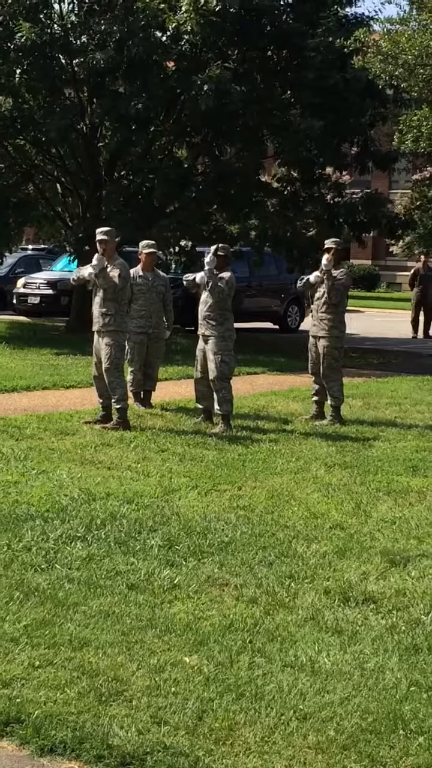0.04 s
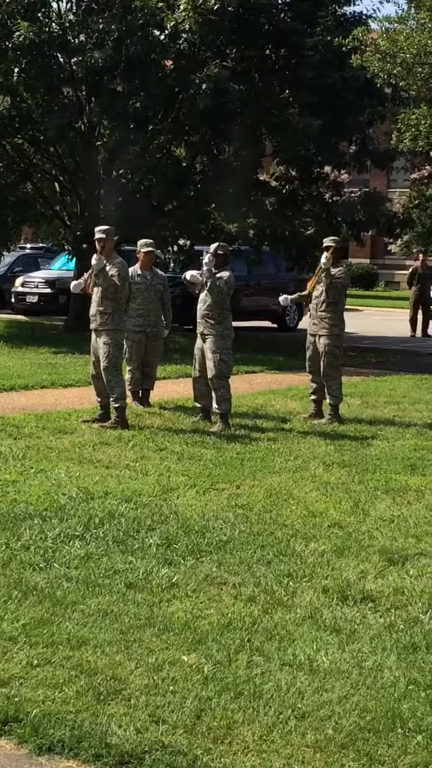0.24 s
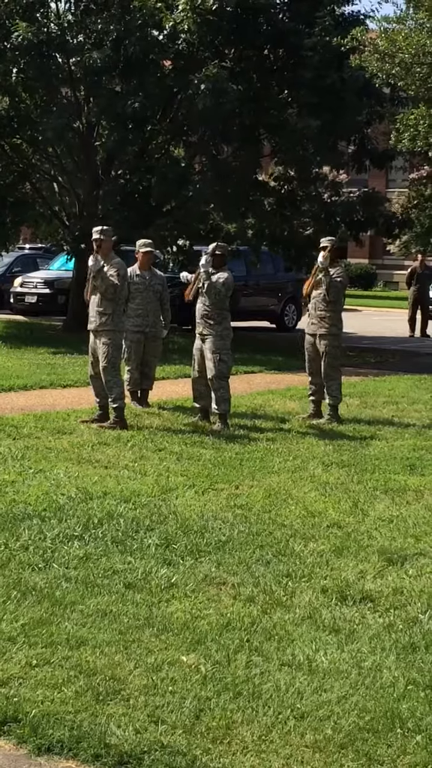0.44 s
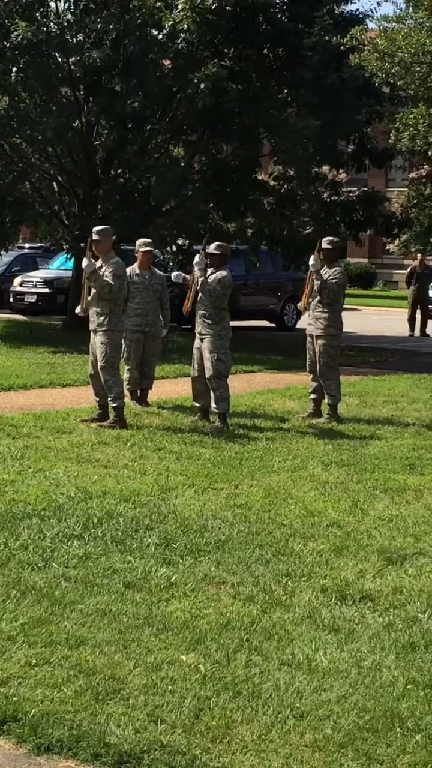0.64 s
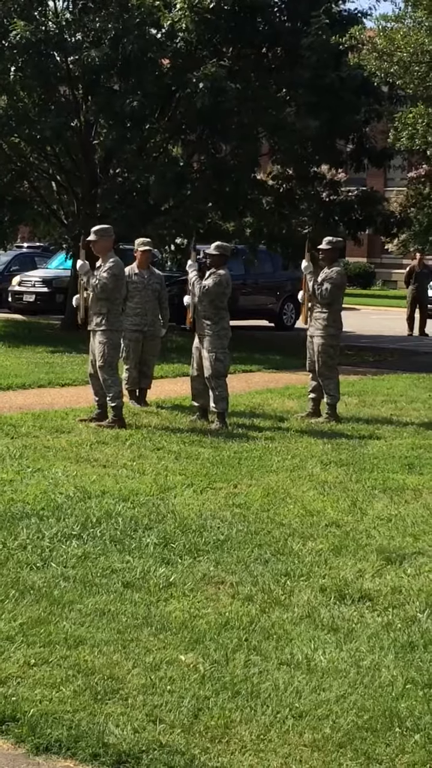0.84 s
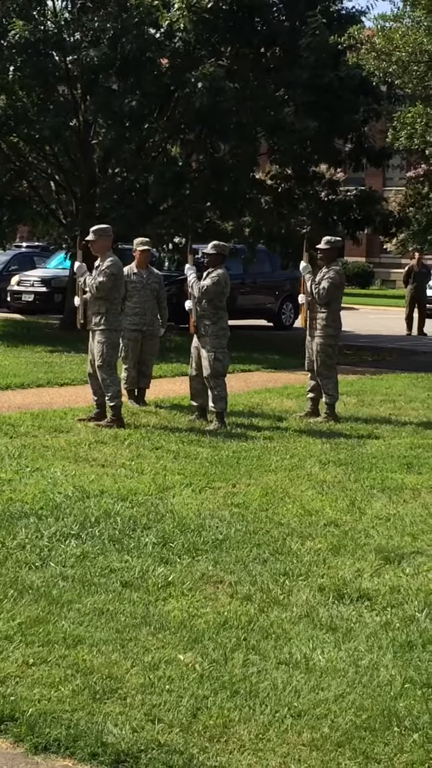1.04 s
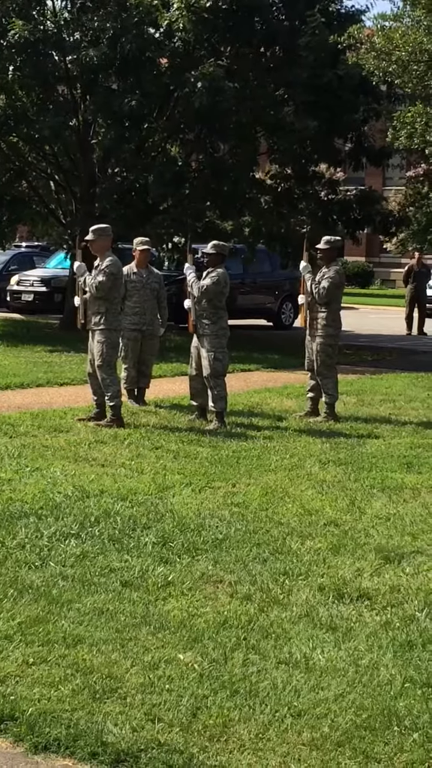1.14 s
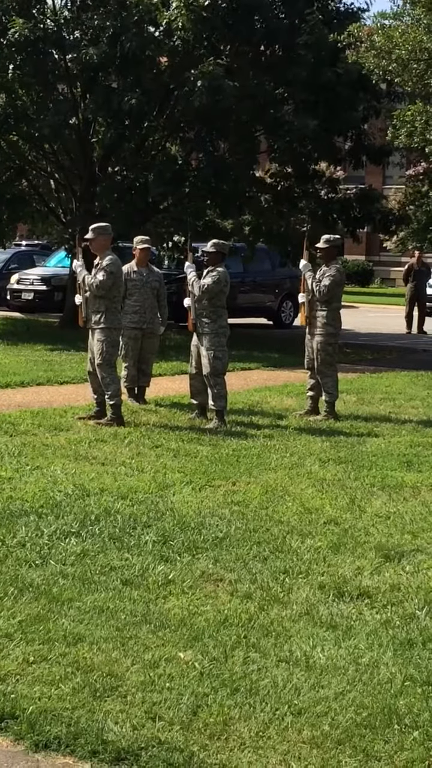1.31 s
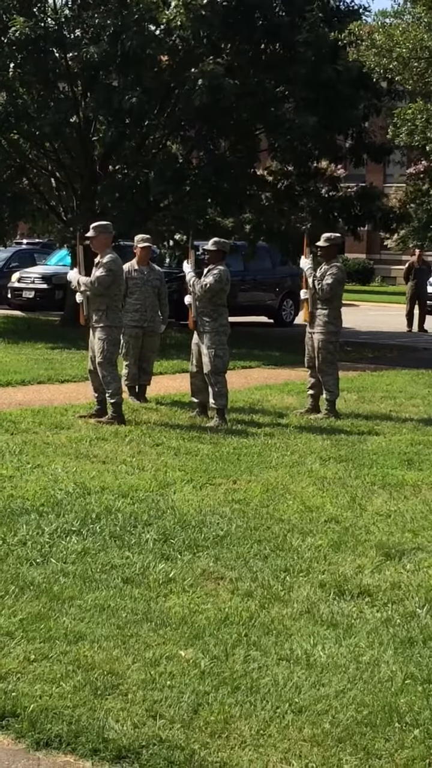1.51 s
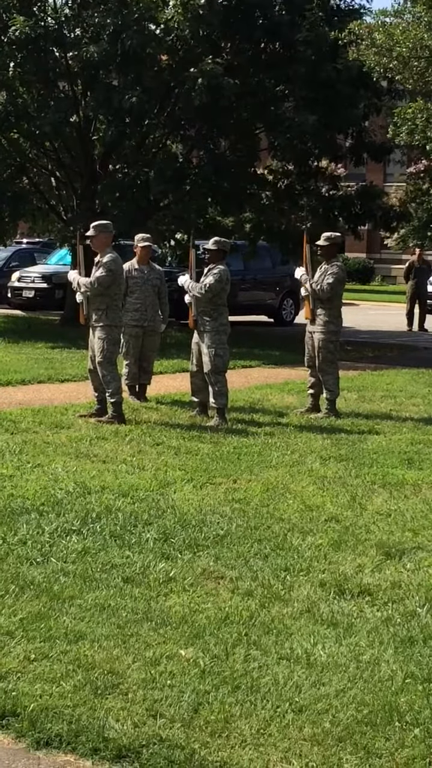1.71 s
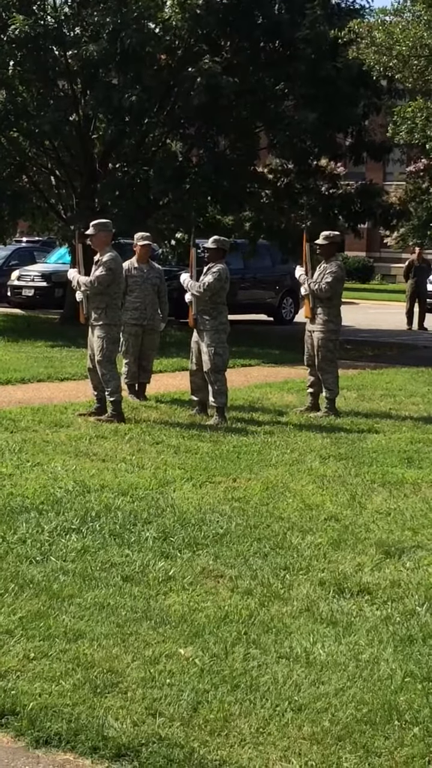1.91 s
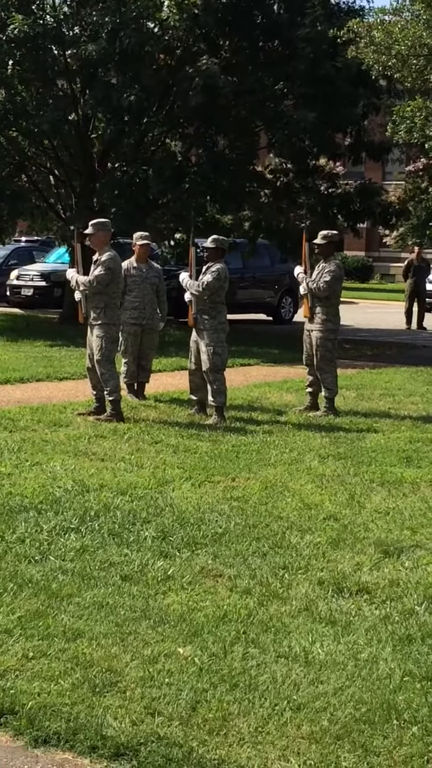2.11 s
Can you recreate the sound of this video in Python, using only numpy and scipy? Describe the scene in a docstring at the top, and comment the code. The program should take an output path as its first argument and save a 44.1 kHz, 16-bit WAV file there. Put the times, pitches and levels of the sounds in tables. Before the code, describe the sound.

A ragged volley of rifle shots cracks across a lawn, echoing off buildings and fading fast

```python
"""A lawn between trees and buildings: a few rifles fire a ragged volley. Blasts are N-shaped pressure pulses
with noise crackle; leaves scatter a bright hiss that dies fast. Walls send back single slaps and dull noise
booms in waves about .45 s apart; a few short sharp clicks follow. Behind it: distant traffic (shaped noise), a
buzzing insect (ticks ringing resonances), two wavering whistles and a faint hum (sines), small metal pings and
dry clicks."""
import sys
import numpy as np
from scipy import signal
from scipy.fft import rfft, irfft
from scipy.io import wavfile

SR = 44100
rng = np.random.default_rng(int(sys.argv[2]) if len(sys.argv) > 2 else 0)


def output_pcm(signal):
    """Save a mono or channel-first signal as 16-bit PCM at the path in sys.argv[1].

    Samples are clipped to [-1, 1] before scaling.
    """
    pcm = np.clip(np.atleast_2d(signal).T, -1, 1) * 32767
    wavfile.write(sys.argv[1], SR, np.round(pcm).astype(np.int16))


def gain_from_decibels(decibels):
    """Convert decibel values to linear amplitude factors."""
    exponent = np.asarray(decibels, float) / 20
    return 10 ** exponent


N = 94815


def rms_one(x):
    """Scale to rms 1."""
    return x / np.sqrt(np.mean(x ** 2) + 1e-20)


def in_time(rows):
    """Table columns as curves in time; ends are held."""
    time_s, *columns = np.transpose(rows)
    return [np.interp(np.arange(N) / SR, time_s, column) for column in columns]


def at_hz(points, hz):
    """Read a table on a log-frequency axis."""
    table_hz, table_db = np.transpose(points)
    return np.interp(np.log(hz), np.log(table_hz), table_db)


def drift(rate_hz):
    """Slow random curve, rms 1: noise through two equal one-pole low-passes, drawn every 40 samples."""
    r = np.exp(-80 * np.pi * rate_hz / SR)
    noise = rng.standard_normal(N // 40 + 2002)
    slow = signal.lfilter([1], [1, -2 * r, r * r], noise)[2000:]
    return np.interp(np.arange(N) / 40, np.arange(len(slow)), rms_one(slow))


def colour(x, spectrum):
    """Shape a noise to a spectrum; rms 1."""
    hz = np.maximum(np.fft.rfftfreq(N, 1 / SR), 1)
    return rms_one(irfft(rfft(x) * gain_from_decibels(at_hz(spectrum, hz)), N))


def bandpass(x, order, low_hz, high_hz):
    """Butterworth band-pass."""
    return signal.sosfilt(signal.butter(order, [low_hz, high_hz], "band", fs=SR, output="sos"), x)


def ring(clicks, hz, t60_s):
    """Two-pole resonance: a unit click sets a decaying sine of height 1 ringing."""
    r, w = gain_from_decibels(-60 / (t60_s * SR)), 2 * np.pi * hz / SR
    return signal.lfilter([0, np.sin(w)], [1, -2 * r * np.cos(w), r * r], clicks + 1e-18)


def add(out, start_s, piece):
    """Mix a piece in at start_s."""
    i = int(start_s * SR)
    out[i:i + len(piece)] += piece[:N - i]


# distant traffic spectrum: hz, relative_db_per_hz
TRAFFIC_COLOUR = [(20, -14), (40, -1.5), (120, 1.5), (200, -7.5), (300, -17), (600, -15.5), (1300, -22),
                  (2700, -29), (4500, -34), (8000, -38), (9500, -44.5), (13000, -50), (16000, -79)]


def traffic():
    """Steady low-heavy noise with a slowly drifting level."""
    level_db = -38.5 + 0.95 * drift(1.4)
    return gain_from_decibels(level_db) * colour(rng.standard_normal(N), TRAFFIC_COLOUR)


# insect body resonances: hz, relative_db, t60_s
TYMBAL = [(4180, -9, .02), (4980, -1, .02), (5300, -2, .018), (5900, -3, .014), (6670, 1, .026),
          (7320, -6, .012), (7880, -4, .014), (8400, -9, .01), (12250, -18, .012)]
# insect level: time_s, rms_db
BUZZ = [(0, -60), (.7, -59), (1.0, -58.5), (1.2, -52.5), (1.75, -58), (2.15, -55)]


def insect():
    """An uneven group of ticks repeats evenly; each resonance answers the ticks in its own pattern."""
    groups_per_s, ticks_per_group = 50.25, 7
    times_s = np.arange(0, N / SR, 1 / (groups_per_s * ticks_per_group))
    body = 0
    for hz, relative_db, t60_s in TYMBAL:
        pattern_db = 4.0 * rng.standard_normal(ticks_per_group)
        pattern_db[0] += 12  # one strong tick per group
        pattern = rms_one(gain_from_decibels(pattern_db) * rng.choice([-1, 1], ticks_per_group))
        place = (np.arange(len(times_s)) + rng.integers(ticks_per_group)) % ticks_per_group
        ticks = np.zeros(N)
        ticks[(times_s * SR).astype(int)] = pattern[place] * gain_from_decibels(rng.normal(0, 1.0, len(times_s)))
        softened = bandpass(ticks, 1, hz * .9, hz * 1.1)
        body = body + gain_from_decibels(relative_db + 1.1 * drift(2.4)) * rms_one(ring(softened, hz, t60_s))
    return gain_from_decibels(in_time(BUZZ)[0]) * rms_one(body)


# pitches of high whistle, low whistle, hum: pitch_hz
TONE_HZ = (2919, 2395, 420)
# levels before waver: time_s, rms_db
HIGH_WHISTLE = [(0, -66), (.17, -53), (.25, -74), (.78, -54), (1.05, -55), (1.24, -70), (1.3, -51),
                (1.4, -57.5), (1.52, -44.5), (1.6, -50), (1.7, -46), (1.77, -57), (1.95, -58.5),
                (2.04, -46.5), (2.12, -55.5)]
LOW_WHISTLE = [(0, -85), (.53, -42), (.66, -72), (.71, -49), (.77, -64), (1.18, -58.5), (1.24, -48),
               (1.3, -57.5), (1.46, -53), (1.76, -62.5), (1.88, -47.5), (2.05, -68)]
HUM = [(1.3, -70), (1.46, -47), (1.54, -55), (1.6, -44), (1.66, -56), (1.72, -49), (1.8, -52.5),
       (1.85, -69)]


def whistles():
    """Two whistles and a low hum: sines whose strength wavers and flutters and whose phase wanders."""
    waver_db, flutter_hz, flutter_share = 1.2, 60, .14
    t, out = np.arange(N) / SR, 0
    for pitch_hz, level in zip(TONE_HZ, (HIGH_WHISTLE, LOW_WHISTLE, HUM)):
        flutter = 1 + flutter_share * drift(flutter_hz)
        level_db = in_time(level)[0] + waver_db * drift(22)
        tone = np.sin(2 * np.pi * pitch_hz * t + 0.49 * drift(23))
        out = out + np.sqrt(2) * gain_from_decibels(level_db) * flutter * tone
    return out


# ringing modes of a small metal part: hz, relative_db, t60_s
PING_MODES = [(8070, 3, 0.28), (10900, 3.5, 0.16)]
# taps on it: start_s, level_db
PING_TAPS = [(.038, -51), (.115, -60)]


def metal_pings():
    """Band-softened taps set the modes of a small metal part ringing."""
    taps = np.zeros(N)
    for start_s, level_db in PING_TAPS:
        add(taps, start_s, gain_from_decibels(level_db) * np.ones(1))
    out = np.zeros(N)
    for hz, relative_db, t60_s in PING_MODES:
        out += gain_from_decibels(relative_db) * ring(bandpass(taps, 1, hz * .95, hz * 1.05), hz, t60_s)
    return out


# short dry clicks, from triggers and bolts or thrown back by a wall: start_s, peak_db, centre_hz
CLICKS = [(0.204, -35, 4630), (0.209, -41, 5400), (.676, -24, 1300), (.735, -23, 1570)]


def dry_clicks():
    """Each click is a decaying noise burst in a band around its centre."""
    t60_s = .02
    out, t = np.zeros(N), np.arange(int(.03 * SR)) / SR
    for start_s, peak_db, centre_hz in CLICKS:
        burst = rng.standard_normal(len(t)) * gain_from_decibels(-60 * t / t60_s)
        burst = bandpass(burst, 4, centre_hz / 1.6, centre_hz * 1.6)
        add(out, start_s, gain_from_decibels(peak_db) * burst / np.abs(burst).max())
    return out


def grains():
    """Dense random echoes of uneven size over smooth noise."""
    echoes_per_s, spread_db = 1300, 3.0
    hit = rng.random(N) < echoes_per_s / SR
    size_db = spread_db * np.minimum(rng.exponential(1, N), 4)
    echoes = hit * gain_from_decibels(size_db) * rng.choice([-1, 1], N)
    return rms_one(echoes) + 0.84 * rng.standard_normal(N)


# returns from walls and far trees: time_s, middle_rms_db, bass_rms_db
RETURN = [(.205, -56, -32), (.212, -42, -44), (.215, -21, -31), (.224, -27.5, -49), (.228, -13.5, -17.5),
          (.245, -20.5, -36), (.28, -18.5, -19), (.30, -22, -21), (.33, -18.5, -20), (.365, -16, -20.5),
          (.41, -22.5, -22.5), (.48, -29.5, -25.5), (.57, -35.5, -28.5), (.65, -36.5, -29),
          (.666, -44, -41), (.674, -25.5, -28), (.72, -26.5, -26), (.79, -27, -21.5), (.85, -37, -38.5),
          (1.08, -40, -32.5), (1.18, -31.5, -28), (1.24, -38.5, -34.5), (1.4, -42.5, -46),
          (1.54, -49.5, -41.5), (1.6, -41, -38.5), (1.8, -51.5, -55), (2.0, -74, -41.5)]
# spectra of middle and bass: hz, relative_db_per_hz
RETURN_COLOUR = [(180, -31), (300, -2), (580, 2.5), (929, -5), (1130, -6), (1770, -21), (2330, -18.5),
                 (5000, -37.5), (6500, -54)]
BOOM_COLOUR = [(18, -46), (30, -0.5), (102, 6.5), (150, 4.5), (190, 5), (265, -5), (330, -17), (430, -121)]


def returns():
    """Dull echoes roll back: middle and bass swell on their own."""
    middle_db, bass_db = in_time(RETURN)
    fade_in = np.clip((np.arange(N) / SR - .19) / .015, 0, 1)
    middle = gain_from_decibels(middle_db) * colour(grains(), RETURN_COLOUR)
    bass = gain_from_decibels(bass_db) * colour(rng.standard_normal(N), BOOM_COLOUR)
    return fade_in * (middle + bass)


# scatter from foliage: time_s, level_db
LEAF = [(.2255, -61), (.2270, -15.5), (.2370, -19), (.2480, -21.5), (.2650, -18), (.3000, -19.5),
        (.3400, -18.5), (.4100, -23), (.4800, -27.5), (.5500, -37.5), (.7000, -45.5), (1.25, -50.5),
        (1.7, -77)]
# its starting spectrum: hz, relative_db_per_hz
LEAF_COLOUR = [(800, -3), (1870, -1), (3380, -4.5), (6780, -4), (12800, -7.5), (15500, -13), (16000, -37)]
# colour change with travel: hz, change_db_per_s
LEAF_LOSS = [(1000, 9), (3000, 9.5), (6000, -30), (16000, -82)]


def leaves():
    """Scattered hiss in quarter-octave bands; the top dies first."""
    level_db, = in_time(LEAF)
    travel_s = np.clip(np.arange(N) / SR - .3, 0, .5)
    noise = colour(rng.standard_normal(N), LEAF_COLOUR)
    edges_hz, out = 900 * 2 ** np.arange(0, 4.3, 1 / 4), 0
    for k, (low_hz, high_hz) in enumerate(zip(edges_hz, edges_hz[1:])):
        shifted = np.roll(noise, k % 2 * 9000)  # keeps neighbouring bands unrelated
        change_db = travel_s * at_hz(LEAF_LOSS, np.sqrt(low_hz * high_hz))
        out = out + bandpass(shifted, 2, low_hz, high_hz) * gain_from_decibels(change_db)
    return out * gain_from_decibels(level_db + 1.6 * drift(90))


def pulse(length_ms, rise):
    """N-shaped pressure pulse with rounded corners and a decaying tail; rise is a share of the length."""
    u = np.arange(int(length_ms * SR / 250)) / (length_ms * SR / 1000)
    return (1 - np.exp(-u / rise)) * (1 - 2 * u) * np.exp(-(1.6 * u) ** 2) * 1.1


# late single echoes off walls, and three short sharp clicks near 1 s: start_s, level_db, length_ms
SLAPS = [(.7070, 0.5, 2.4), (0.7352, -5, 2.14), (0.7725, -4, 10.7), (.9322, -10.5, 1.3), (.9683, -11, 0.5),
         (1.0035, -15.5, 0.4), (1.013, -8.5, 8.1), (1.215, -7.5, 6.1)]


def slaps():
    """Late wall echoes and a few short sharp clicks: pressure pulses rounded by a low-pass."""
    out, low_pass = np.zeros(N), signal.butter(2, 7600, fs=SR)
    for start_s, level_db, length_ms in SLAPS:
        rounded = signal.lfilter(*low_pass, pulse(length_ms, rise=0.36))
        add(out, start_s, -gain_from_decibels(level_db) * rounded)
    return out


# muzzle blasts and their first strong reflections: start_s, level_db, length_ms, crackle_db
BLASTS = [(0.213, -20, 2.1, -41), (0.2268, 9, 1.22, 0), (0.231, -6.5, 5.2, -14.5), (0.25, 8, 1.36, -8.5),
          (.2520, -3, 1.3, -8.5), (.2780, -9.5, 2.1, -13.5), (0.2887, 5.5, 2.3, -17),
          (0.3074, 6.5, 3.4, -9), (0.3176, 5, 2.1, -24), (0.345, 3, 6.4, -25), (0.364, 8.5, 2, -21),
          (0.369, -3.5, 2.4, -42), (.3750, 6.5, 2.4, -35), (0.446, -5, 3.6, -18.5), (0.479, -1.5, 1.3, -29)]
# resonances in the crackle: hz, relative_db, t60_s
CRACK_RINGS = [(2420, -11, 0.0047), (5060, -8, 0.0025)]


def blasts():
    """Each blast is a pressure pulse with a short burst of bright, ringing crackle."""
    crackle_t60_s, low_hz, high_hz = .03, 400, 9000
    out, t = np.zeros(N), np.arange(int(.04 * SR)) / SR
    for start_s, level_db, length_ms, crackle_db in BLASTS:
        add(out, start_s, -gain_from_decibels(level_db) * pulse(length_ms, rise=0.34))
        burst = gain_from_decibels(crackle_db - 60 * t / crackle_t60_s) * rng.standard_normal(len(t))
        crackle = .5 * bandpass(burst, 1, low_hz, high_hz)
        for hz, relative_db, t60_s in CRACK_RINGS:
            crackle += gain_from_decibels(relative_db - 13.5) * ring(burst, hz, t60_s)
        add(out, start_s, crackle)
    return out


def scene():
    """All sources, one microphone."""
    background = traffic() + insect() + whistles() + metal_pings() + dry_clicks()
    volley = returns() + leaves() + slaps() + blasts()
    return (background + volley)[None]


def band_limit(x):
    """A steep low-pass at the top of the band."""
    return signal.sosfilt(signal.butter(12, 16510, fs=SR, output="sos"), x)


def record(dry):
    """Low cut, peaks rounded by tanh, steep top cut."""
    low_cut_hz, ceiling, top_cut_hz = 60, .7, 16500
    x = signal.sosfilt(signal.butter(2, low_cut_hz, "high", fs=SR, output="sos"), dry)
    rounded = ceiling * np.tanh(x / ceiling)
    mix = signal.sosfilt(signal.cheby2(10, 60, top_cut_hz, fs=SR, output="sos"), rounded)
    return band_limit(mix)


dry = scene()
out = record(dry)
output_pcm(out)
```